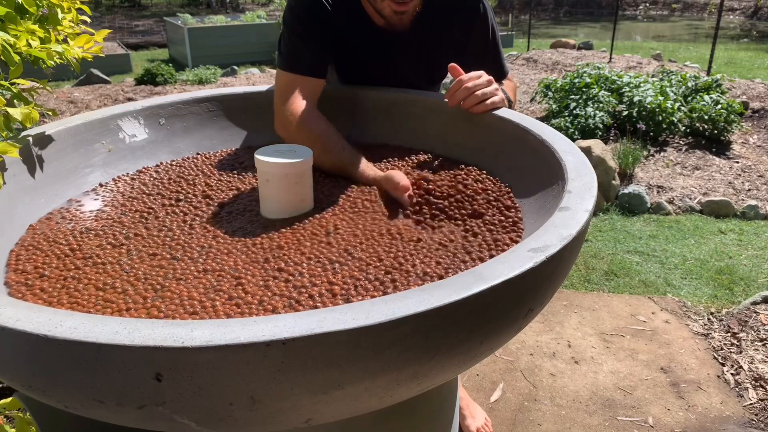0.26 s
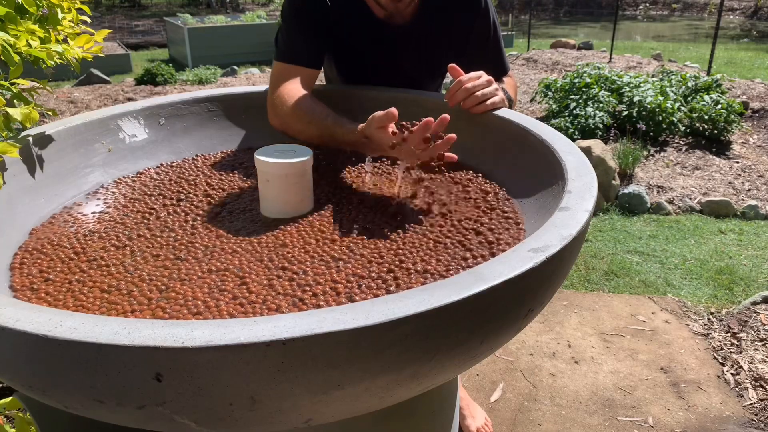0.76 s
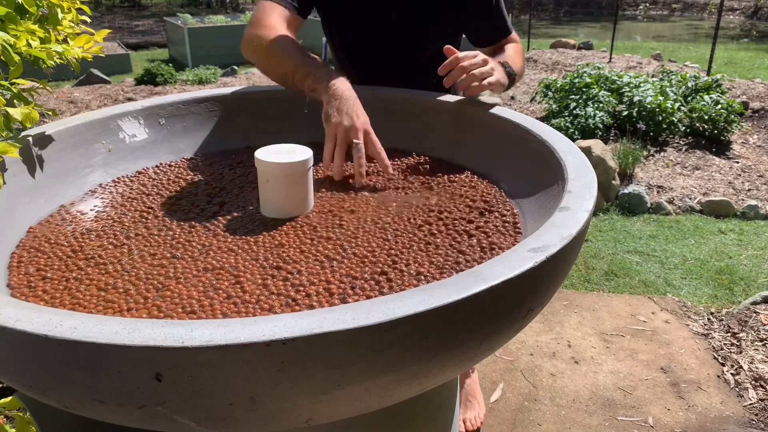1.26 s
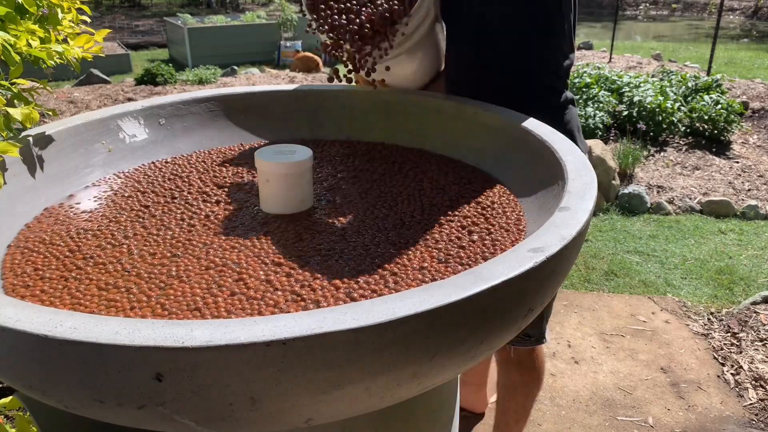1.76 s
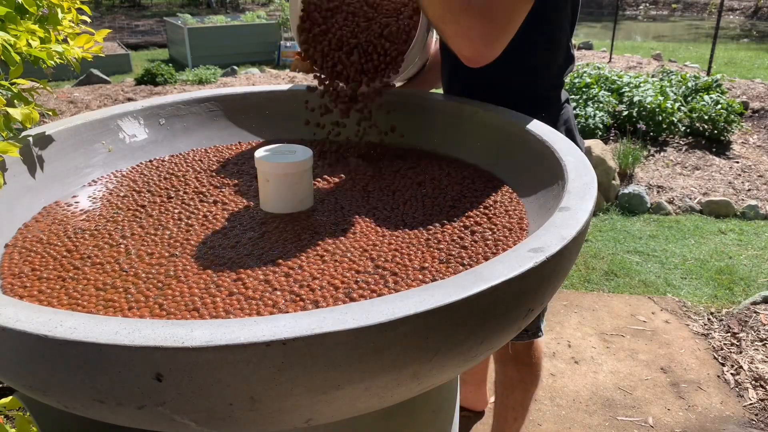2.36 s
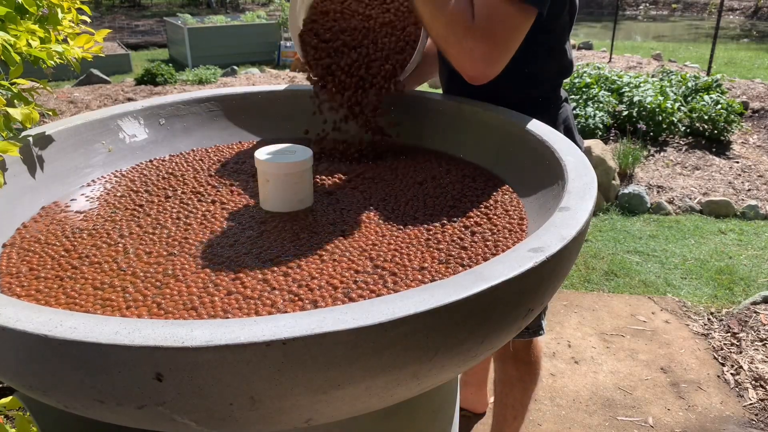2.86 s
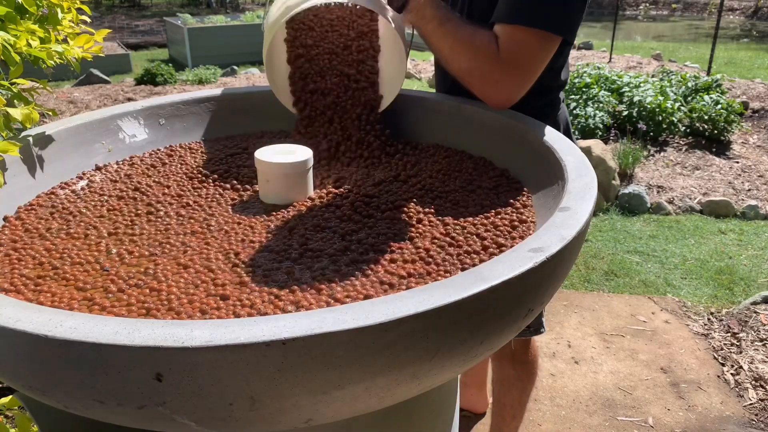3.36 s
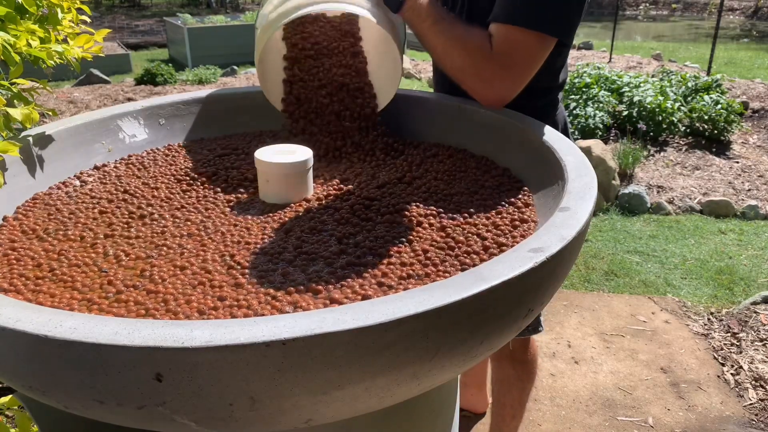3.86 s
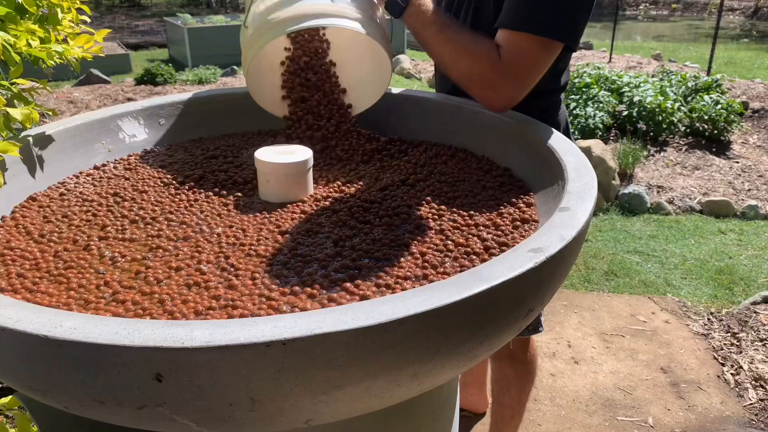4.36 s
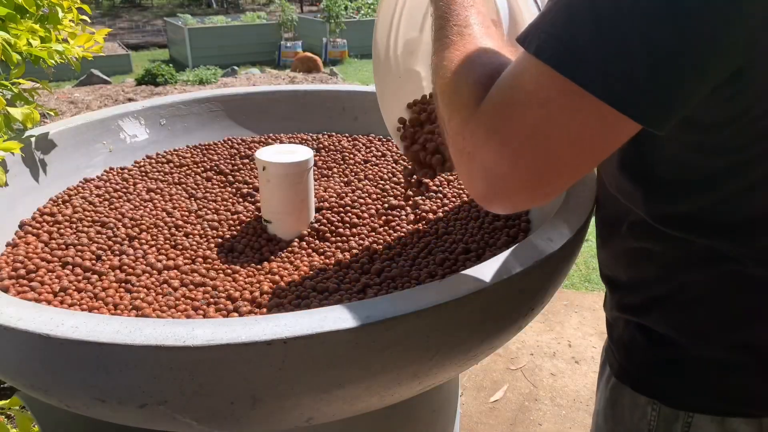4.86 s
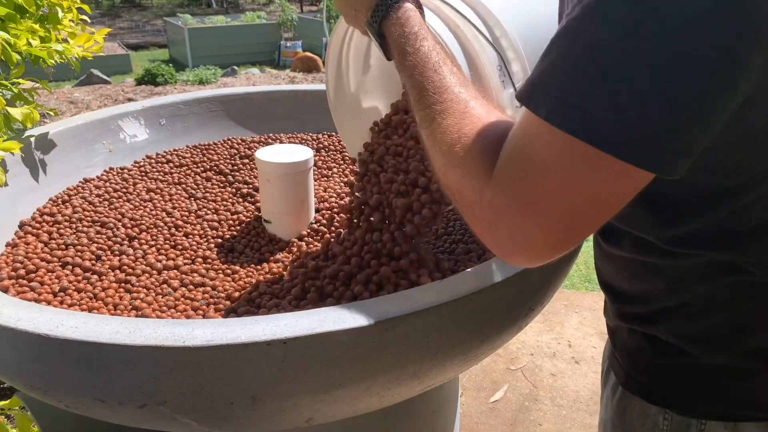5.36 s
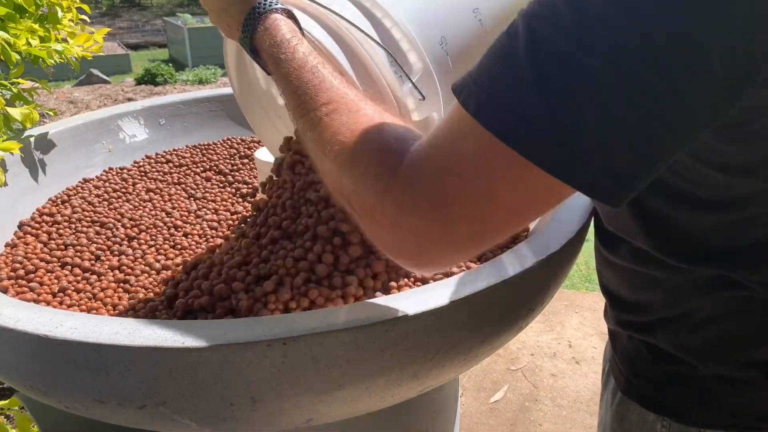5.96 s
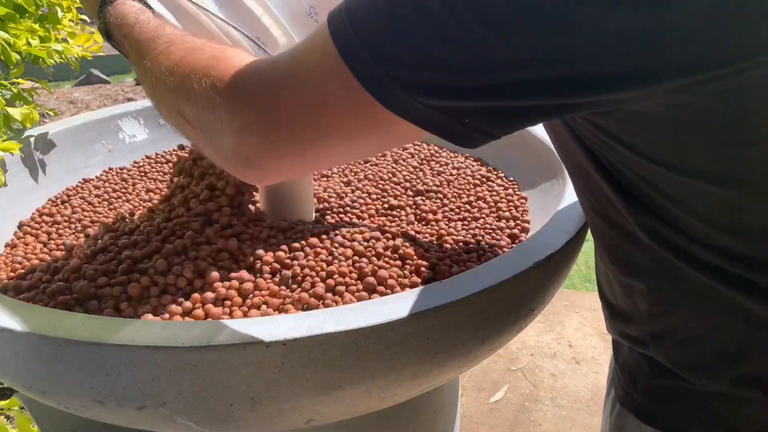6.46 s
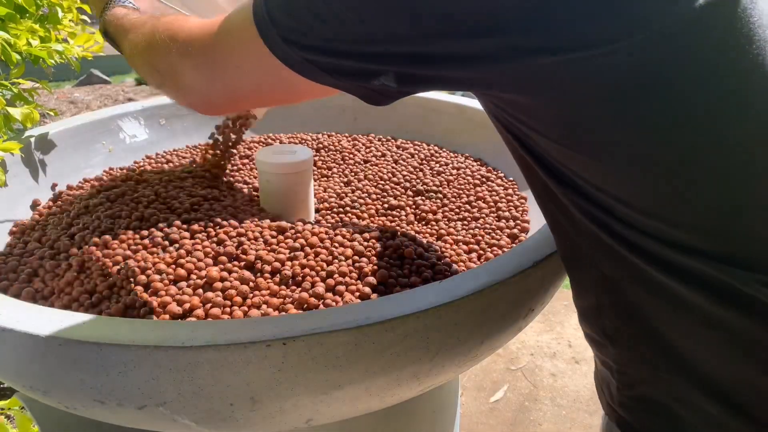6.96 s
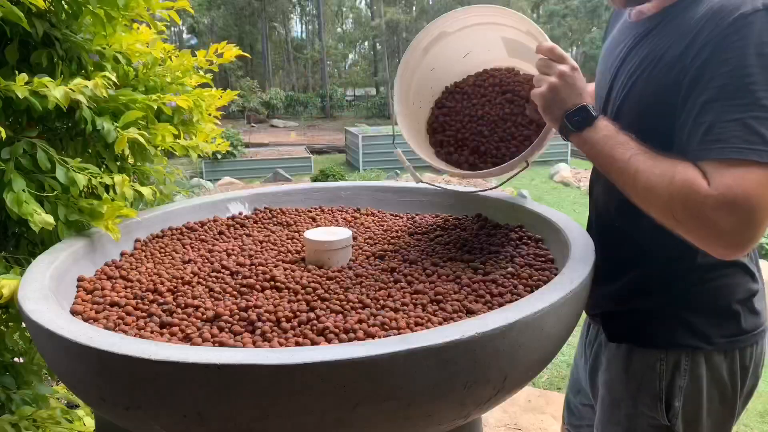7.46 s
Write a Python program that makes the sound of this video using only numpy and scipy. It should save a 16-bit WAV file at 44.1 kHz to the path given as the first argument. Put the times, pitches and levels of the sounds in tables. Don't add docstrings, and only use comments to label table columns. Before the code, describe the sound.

Close, dry outdoor camera sound with little treble above 7 kHz. Faint garden hush and tiny drips open; at about 0.3 s a hand stirs wet clay pebbles, with two hard snaps near 0.45 s. From 0.7 to 1.3 s light clinks, fine ticks and rising bubble plops trickle down, fading to silence at 1.5 s. At 1.6 s a pour bursts in with clacks and splashy rattle, dull blows near 1.9 s and a bright one at 2.5 s, dipping at 3.0 s. A thinner, bass-less stream of clumpy knocks over faint water swells around 3.5 and 4.0 s. After a cut at 4.35 s comes the loudest dense clatter, tumbling until 5 s, with a rap at 5.15 s; its lows thin after 5.2 s. Hollow plastic resonance joins from 6.2 s, then a rap near 7 s and dwindling stragglers. A new pour with hard raps starts at 7.35 s and runs to the end.

```python
import sys
import numpy as np
from scipy import signal
from scipy.fft import rfft, irfft, next_fast_len
from scipy.io import wavfile
from scipy.ndimage import uniform_filter1d, map_coordinates

SR = 44100
rng = np.random.default_rng(int(sys.argv[2]) if len(sys.argv) > 2 else 0)


def linear_from_db(decibels):
    return 10 ** (np.asarray(decibels, float) / 20)


def materialize(psi):
    bounded = np.clip(np.atleast_2d(psi).T, -1, 1)
    quanta = np.round(bounded * 32767).astype(np.int16)
    wavfile.write(sys.argv[1], SR, quanta)


N = 340452
NOW_S = np.arange(N) / SR


def unit(x):
    return x / np.sqrt(np.mean(x ** 2) + 1e-20)


def along(points, hz):
    f, v = np.transpose(points)
    return np.interp(np.log(hz + 1), np.log(f + 1), v)


def filtered(x, response):
    m = next_fast_len(len(x) + 8192)
    return irfft(rfft(x, m) * response(np.fft.rfftfreq(m, 1 / SR)), m)[:len(x)]


def above(hz, edge_hz, order):
    return 1 / np.sqrt(1 + (edge_hz / (hz + 1)) ** (2 * order))


def wobble(n, rate):
    return map_coordinates(rng.standard_normal(n // 100 + 4), [np.arange(n) * min(rate, 400) / SR])


def luck_within_two(shape):
    return np.clip(rng.standard_normal(shape), -2, 2)


def placed(waves, start_s, n):
    at = np.round(start_s * SR).astype(int) + np.arange(waves.shape[1])
    return np.bincount(at.ravel(), waves.ravel(), n + SR)[:n]


def rings(n, start, size, hz, t60, rise=0, length=384, soft=0.25):
    t = np.arange(length) / SR
    turns = hz[:, None] * t
    life = t / t60[:, None]
    wave = size[:, None] * linear_from_db(-60 * life) * np.sin(2 * np.pi * turns * (1 + rise * life))
    wave = wave * (1 - np.exp(-(turns / soft) ** 2))
    return placed(wave, start[:, None], n)


# pitch_hz, level_db
GARDEN = [(88, -54), (150, -19.5), (767, -13), (1270, -9), (1820, -14), (4050, -4.5), (6390, -8),
          (7400, -12.5), (9620, -57), (16300, -120)]
# start_s, level_db
AIR = [
    (0, -72),
    (.03, -61.5),
    (1.25, -54.5),
    (1.4, -66),
    (1.48, -100),
    (1.49, -130),
]


def garden():
    level_db = np.interp(NOW_S, *np.transpose(AIR))
    return linear_from_db(level_db) * unit(filtered(rng.standard_normal(N), lambda f: linear_from_db(along(GARDEN, f))))


# start_s, level_db
MURMUR = [
    (3.02, -97),
    (3.1, -63.5),
    (3.4, -60),
    (3.9, -67),
    (4.25, -66),
    (4.34, -101),
]


def murmur():
    level_db = np.interp(NOW_S, *np.transpose(MURMUR), left=-140, right=-140)
    band = lambda f: above(f, 540, order=8) * above(760, f, order=8)
    return linear_from_db(level_db) * unit(filtered(rng.standard_normal(N), band))


# start_s, peak_db, pitch_hz, t60_s
BUBBLES = [
    (0.034, -35, 2300, 0.018),
    (0.06, -25, 3240, 0.037),
    (0.216, -44, 630, 0.053),
    (1.243, -41, 1960, 0.086),
    (1.264, -48, 2370, 0.034),
           (0.344, -16, 765, 0.011), (0.784, -31, 930, 0.016), (0.918, -46, 1430, .04),
         (0.937, -41.5, 1200, 0.068), (.963, -41, 990, .03), (1.007, -27, 780, 0.044),
         (1.027, -31, 1510, 0.046), (1.083, -43, 1500, 0.043), (1.108, -42, 1960, .04),
         (1.173, -33.5, 770, 0.064), (1.175, -45, 1280, .06), (1.192, -42, 865, 0.076),
         (1.209, -46, 1270, 0.07), (1.246, -43, 1200, 0.07), (1.262, -38, 1410, 0.034)]


def bubbles():
    s, db, hz, t60 = np.transpose(BUBBLES)
    return rings(N, s, linear_from_db(db), hz, t60, rise=0.096, length=4096, soft=1.4)


def knocks(table, swell_s, gain_db, side_db, top_hz, top_db, crack_db):
    s, db, hz = np.transpose(table)[:, :, None]
    luck = rng.random((len(table), 18))
    t = np.arange(768) / SR
    swell = swell_s * (.75 + .5 * luck[:, [0]])
    body = t / swell * np.exp(1 - t / swell)

    def tone(f, k):
        return np.sin(2 * np.pi * (f * t + luck[:, [k]]))

    def cluster(f, first):
        return sum(tone(f * 2 ** (.8 * luck[:, [k]] - .4), k + 1) for k in range(first, first + 8, 2)) / 2

    wave = body * (tone(hz, 1) + linear_from_db(side_db) * cluster(hz, 2) + linear_from_db(top_db) * cluster(top_hz, 10))
    grit = rng.standard_normal((len(table), len(t) + 5))
    wave += linear_from_db(crack_db) * body ** 2 * (grit[:, 5:] - grit[:, :-5])
    wave *= linear_from_db(db + gain_db + 3) / np.abs(wave).max(axis=1, keepdims=True)
    return placed(wave, s - swell, N)


# peak_s, peak_db, pitch_hz
CLINKS = [(0.7474, -39, 2330), (0.7631, -38, 2590), (0.7719, -39, 2650), (0.7809, -41, 2880),
          (0.8086, -29, 3260), (0.8219, -28, 3080), (0.8298, -26, 2980), (0.8392, -26, 3030),
          (0.8451, -27, 3040), (0.8496, -34, 2700), (0.856, -26, 3170), (0.8614, -30, 3200),
          (0.886, -28, 2800), (0.8944, -34, 2680), (0.9061, -32, 2670), (0.9171, -30, 2630),
          (0.9271, -33, 2870), (0.9337, -29, 2690), (0.9451, -27, 2920), (0.9512, -27, 2730),
          (0.9625, -24, 2640), (0.9698, -25.5, 2340), (0.9779, -30, 2910), (0.9885, -30, 2700),
          (0.9979, -25, 3490), (1.0082, -23, 2600), (1.0181, -21, 2550), (1.0222, -27, 2950),
          (1.0279, -17.5, 2910), (1.0334, -25, 2580), (1.0399, -28, 3170), (1.0535, -27.5, 2430),
          (1.0849, -28, 2400), (1.0998, -30, 2880), (1.1047, -26, 2900), (1.1101, -27, 2770),
          (1.1167, -24.5, 2960), (1.1239, -31, 3400), (1.1619, -28, 2840), (1.1679, -29, 3960),
          (1.1778, -23.5, 2640), (1.2717, -39.5, 2330)]
CLUMPS = [(3.367, -15.5, 1450), (3.3783, -12.5, 1460), (3.385, -19.0, 1420), (3.3956, -12.5, 1440),
          (3.4207, -19.0, 1420), (3.4667, -21.0, 1870), (3.4874, -12.0, 1490), (3.494, -19.5, 1520),
          (3.5007, -15.0, 1910), (3.5082, -18.5, 1730), (3.5262, -19.5, 1790), (3.5343, -19.0, 2150),
          (3.5437, -17.5, 1530), (3.55, -13.5, 1530), (3.5617, -14.5, 1550), (3.5964, -15.5, 1520),
          (3.6078, -17.5, 1570), (3.6299, -21.5, 1610), (3.6482, -20.0, 1780), (3.6556, -17.0, 1500),
          (3.6646, -19.0, 1550), (3.6728, -16.5, 1440), (3.679, -15.5, 1580), (3.84, -21.0, 1570),
          (3.8699, -13.5, 1800), (3.894, -12.0, 1600), (3.903, -8.0, 1540), (3.9126, -11.0, 1500),
          (3.9191, -10.0, 1700), (3.9309, -9.5, 1600), (3.9413, -7.5, 1410), (3.9542, -10.0, 1490),
          (3.9638, -10.5, 1460), (3.9731, -14.5, 1580), (3.9797, -12.0, 1840), (3.9865, -9.0, 1440),
          (3.9971, -7.5, 1520), (4.0063, -10.0, 1480), (4.0261, -13.0, 1540), (4.0377, -11.5, 1680),
          (4.046, -17.0, 1700), (4.0539, -12.0, 1920), (4.0837, -16.0, 1290), (4.0901, -12.0, 1440),
          (4.1027, -16.5, 1640), (4.1252, -18.5, 1610), (4.138, -18.0, 2010), (4.1525, -18.0, 2140),
          (4.1693, -14.5, 1600), (4.1755, -16.0, 1550), (4.1843, -12.0, 1490), (4.1906, -18.0, 1520),
          (4.1982, -17.0, 2210), (4.208, -15.0, 1820), (4.2204, -17.5, 1420), (4.2356, -21.0, 1920)]
SPRAYS = [(0.7452, -31, 6000), (0.81, -28.5, 6440), (0.815, -27, 6270), (0.8193, -30, 6200),
          (0.831, -30, 5750), (0.85, -22.5, 5450), (0.861, -28, 4840), (0.91, -21.5, 7120),
          (0.9166, -29, 5700), (0.9254, -26, 5400), (0.933, -23, 6400), (0.9497, -27, 5550),
          (0.962, -27.5, 6030), (0.9697, -28, 6300), (1.0056, -27, 6150), (1.02, -18.5, 5220),
          (1.028, -18.5, 5530), (1.0364, -25, 5850), (1.0442, -31, 6410), (1.113, -26, 6240),
          (1.118, -27, 6240), (1.1247, -26, 6500), (1.1357, -36, 6300), (1.161, -25, 5200),
          (1.168, -26, 4640), (1.181, -26, 4720), (1.264, -27, 5640)]
OPENING = [(1.6164, -12.5, 2000), (1.621, -17, 1930), (1.635, -16, 1860), (1.6357, -10, 1460),
           (1.651, -4.5, 1460), (1.657, -12, 1440), (1.666, -6, 1470), (1.675, -10, 1820),
           (1.687, -8.5, 3300), (1.691, -14, 1440), (1.7, -10.5, 2470), (1.707, -6.5, 2230),
           (1.7152, -8, 1420), (1.7283, -14, 2260), (1.7377, -10, 1310), (1.7461, -11, 1180)]
TUMBLE = [(4.5019, -5.0, 2080), (4.5171, -7.5, 2090), (4.5437, -4.5, 2060), (4.5834, -1.5, 970),
          (4.6071, -3.5, 1370), (4.6163, -6.0, 2680), (4.6314, -5.5, 2660), (4.6448, -6.0, 2250),
          (4.6721, -6.0, 1220), (4.6856, -5.5, 1300), (4.7136, -5.5, 2190), (4.7241, -6.0, 2150),
          (4.7407, -7.0, 1950), (4.7685, -1.5, 2450), (4.7938, -6.5, 1940), (4.8032, -8.5, 1570),
          (4.8145, -8.5, 1690), (4.8257, -7.5, 2400), (4.8408, -2.0, 2570), (4.8644, -3.0, 1350),
          (4.8715, -4.5, 2280), (4.8805, -4.5, 2310), (4.8997, -7.0, 2430), (4.9068, -4.5, 2810),
          (4.9207, -7.0, 2130), (4.9365, -3.5, 1860), (4.9456, -6.5, 2230), (4.9554, -6.5, 1720),
          (4.9657, -7.0, 2470), (4.9871, -4.0, 2530)]
STRAGGLERS = [(7.1065, -12.5, 2300), (7.1148, -12.0, 2280), (7.1263, -11.0, 2450), (7.1424, -9.0, 2820),
              (7.1541, -9.5, 2370), (7.1684, -10.0, 2300), (7.1798, -10.0, 2710), (7.1923, -11.5, 3220),
              (7.2058, -15.0, 2720), (7.2164, -18.5, 3110), (7.2241, -20.5, 2820), (7.2363, -21.5, 2970),
              (7.2435, -27.0, 3010), (7.254, -29.0, 2860), (7.2782, -33.0, 2800)]
RATTLES = [(2.4565, -9, 3200), (2.4868, -13.5, 3240), (2.5834, -14, 3420), (3.421, -19.5, 890),
           (3.545, -16, 850), (3.552, -16.5, 2590), (3.924, -12.5, 2840), (3.966, -13, 2350),
           (4.184, -18, 2690)]
# swell_s, gain_db, neighbour_db, upper_hz, upper_db, crack_db
KNOCK_KINDS = [
    (0.0012, 0.5, -3.5, 7900, -9.5, -23),
    (0.0022, -2.5, -5, 2600, -11, -24),
    (0.0019, -2.5, -2, 6600, -9, -19),
    (0.0014, -1, -10, 5200, -5, -14.5),
    (0.0012, -3.5, -2, 5400, -11.5, -10.5),
    (0.0014, 1, -1, 7100, -2.5, -6),
    (0.0025, -3, -6, 9100, -24.5, -23),
]


def single_knocks():
    tables = [CLINKS, CLUMPS, SPRAYS, OPENING, TUMBLE, STRAGGLERS, RATTLES]
    return sum(knocks(table, *kind) for table, kind in zip(tables, KNOCK_KINDS))


def clatter(table, t60, spread_s, gain_db, top_hz, top_db):
    upper = luck_within_two((len(table), 2)) * [.06, 2.5]
    s, db, hz, off, off_db = np.repeat(np.hstack([table, upper]), 4, axis=0).T
    luck = rng.random((len(s), 3))
    later = np.tile([0, 1, 2, 3], len(table))
    start = s + (later - 0.54 * luck[:, 0] * (later > 0)) * spread_s
    size = linear_from_db(db + gain_db - 1.2 * later * luck[:, 1])
    detune = (later > 0) * (luck[:, 2] - .5)
    low_hz = hz * (1 + 0.08 * detune)
    high_hz = top_hz * (1 + off + .3 * detune)
    low = rings(N, start, size, low_hz, np.full(len(s), t60), length=1024)
    high_size = size * linear_from_db(top_db + off_db)
    return low + rings(N, start, high_size, high_hz, np.full(len(s), .5 * t60), length=1024)


# start_s, peak_db, pitch_hz
SNAPS = [
    (0.326, -31, 3400),
    (0.385, -24, 2730),
    (0.405, -18, 2870),
    (0.45, 3, 2980),
    (0.483, 1, 3100),
    (0.5114, -14, 2480),
    (0.549, -22, 3080),
]
BLOWS = [
    (1.9165, -8.5, 1190),
    (1.939, -12.5, 1790),
    (2.4992, -7.5, 2630),
]
RAPS = [
    (5.152, -3, 1980),
    (6.971, -3, 1430),
    (7.437, -12, 1300),
    (7.497, -2, 1440),
    (7.652, -3, 2300),
]
# t60_s, contact_gap_s, gain_db, upper_hz, upper_db
KINDS = [
    (0.0065, 0.00097, -17.5, 3360, -7),
    (0.0067, 0.0014, -5.5, 17000, -9),
]
RAP_KIND = (.006, .0008, -1, 4600, -15)


def loud_strikes():
    return sum(clatter(table, *kind) for table, kind in zip([SNAPS, BLOWS, RAPS], [*KINDS, RAP_KIND]))


# low_hz, high_hz
BANDS_HZ = [
    (1250, 3850),
    (780, 1250),
    (4000, 7500),
    (150, 780),
]


def pour(span, flow, knock, colour, count, wash_db, scatter_db, cycles, spread, clump_db, thud_db):
    n = round((span[1] - span[0]) * SR)
    s, clack_db, clack_hz, crisp_db = np.transpose(flow)
    strongest_db = clack_db.max()
    knock_db = strongest_db + knock[0] + knock[1] * (clack_db - strongest_db)
    levels = [clack_db, knock_db, clack_db + crisp_db, knock_db + thud_db]
    now = span[0] + np.arange(n) / SR
    start = rng.random(int(count * n / SR)) * n / SR
    blow_db = scatter_db * luck_within_two(len(start))
    clumps = linear_from_db(clump_db * np.clip(wobble(n, 88.8), -2, 2))
    hollow_hz = np.interp(span[0] + start, s, clack_hz)
    out = np.zeros(n)
    for k, ((lo, hi), db) in enumerate(zip(BANDS_HZ, levels)):
        is_clack, is_tick = k == 0, k == 2
        pick = luck_within_two((len(start), 3))
        if is_clack:
            hz = hollow_hz * 2 ** (spread * pick[:, 2])
        else:
            hz = lo * (hi / lo) ** rng.random(len(start))
        size = linear_from_db(blow_db + 3 * pick[:, 0])
        near = rings(n, start, size, hz, 3 * cycles / hz * linear_from_db(3 * pick[:, 1]))
        far = linear_from_db(wash_db[is_tick]) * rng.standard_normal(n)
        sway_db = 0.67 * wobble(n, 45.21) + 0.47 * is_tick * wobble(n, 14.28)
        mix = clumps * linear_from_db(sway_db) * (unit(near) + far)
        shape = lambda f: linear_from_db(along(colour, f)) * above(f, lo, order=9) * above(hi, f, order=9)
        out += linear_from_db(np.interp(now, s, db)) * unit(filtered(mix, shape))
    return np.pad(out, (round(span[0] * SR), N))[:N]


def surges(tables):
    jam_db, jam_s, rush_db, rush_s = -6, .012, 1, .02
    strikes = np.sort(np.concatenate([np.transpose(t)[0] for t in tables] + [[-9, 99]]))
    after = np.searchsorted(strikes, NOW_S)
    jam = jam_db * np.exp((NOW_S - strikes[after]) / jam_s)
    rush = rush_db * np.exp((strikes[after - 1] - NOW_S) / rush_s)
    return linear_from_db(jam + rush)


# start_s, end_s
SPANS = [
    (0, .6),
    (.6, 1.49),
    (1.51, 3.006),
    (3.02, 4.342),
    (4.356, 6.36),
    (6.36, 7.317),
    (7.335, 7.72),
]
# start_s, level_db, hollow_pitch_hz, tick_over_flow_db
STIR = [(0, -56, 2760, -5), (.2, -61, 2550, -3), (.31, -42, 2500, -2), (.335, -39, 2800, 10.5),
        (.402, -22, 3000, -2), (.546, -27.5, 2860, -6), (.6, -37, 2800, -11)]
TRICKLE = [(.6, -36, 2400, -13), (.66, -33.5, 2220, -18), (.8, -44, 2920, -2), (.98, -44, 2430, 1.5),
           (1.02, -33, 2860, -4), (1.075, -42, 2400, -10.5), (1.186, -41.5, 2880, 3.5),
           (1.23, -61, 2290, 1), (1.49, -87, 3080, 4)]
SPLASH = [(1.51, -65, 1730, -40.5), (1.545, -45.5, 1890, -27), (1.564, -40, 1850, -12),
          (1.61, -27.5, 2080, -12), (1.645, -16, 1760, -7), (1.792, -19.5, 2120, -8.5),
          (1.961, -28, 2060, 5.5), (2.5, -20.5, 2070, -4.5), (2.873, -21.5, 2210, 0.5),
          (2.993, -32.5, 2070, -3), (3.006, -63, 1770, -7)]
SINK = [(3.02, -46, 1790, -6), (3.038, -49.5, 1780, -8), (3.152, -35, 1494, -8),
        (3.608, -24.5, 1620, -13.5), (3.792, -29.5, 1690, -10.5), (3.935, -19.5, 1620, -23),
        (4.15, -26.5, 1830, -11.5), (4.208, -22, 1600, -16), (4.342, -49.5, 1540, -12)]
HEAP = [(4.359, -57, 2090, -14), (4.401, -29.5, 1940, -8), (4.5, -11, 1930, -15), (4.819, -12.5, 1945, -14),
        (4.9, -10.5, 1930, -18), (5.14, -14, 2067, -7), (5.84, -12.5, 2047, -12), (6.2, -13, 1730, -8),
        (6.36, -13.5, 2090, -8.5)]
EMPTY = [(6.36, -12, 2020, -9.5), (6.86, -14, 2190, -7), (6.93, -17.5, 2440, -3), (6.974, -13, 2435, -5.5),
         (7.1, -19, 2130, -4), (7.2, -19.5, 2620, -5), (7.26, -41.5, 2610, -6), (7.317, -55, 2500, -6)]
TIP = [(7.335, -52, 1680, -7), (7.349, -51, 1590, -13), (7.353, -34, 1630, -15), (7.371, -32, 1590, -16),
       (7.415, -17.5, 1620, -13.5), (7.432, -19, 1680, -12.5), (7.483, -12.5, 1890, -11),
       (7.681, -13, 2177, -13), (7.72, -19, 1860, -14.5)]
# pitch_hz, level_db
STIRRED = [(88, -71), (150, -68.5), (412, -35), (684, -20), (1550, -13.5), (2040, -11.5), (2920, -10),
           (4180, -5.5), (6390, 2), (7400, -9.5), (9620, -74), (16300, -120)]
TRICKLING = [(180, -86), (300, -45), (777, -10), (964, -6), (1520, -20.5), (1860, -27), (2530, -14.5),
             (3780, -12), (6220, 2), (7400, -7), (9620, -59), (16300, -120)]
SPLASHING = [(88, -66.5), (150, -24.5), (328, -12.5), (440, -7.5), (641, 5), (845, -20.5), (1130, -11.5),
             (1420, -15.5), (2480, -14.5), (4690, -8), (6080, -0.5), (7050, -4), (7400, -6.5),
             (9620, -45.5), (16300, -120)]
SINKING = [(290, -85), (500, -55), (750, -29), (794, -4), (859, -13), (1130, -16.5), (1510, -14),
           (2940, -13.5), (3640, -20), (6180, -16), (7400, -26), (9620, -75), (16300, -120)]
HEAPING = [(88, -50), (150, -45), (201, -28), (380, -21), (527, -12), (662, -10.5), (905, -3), (979, 2),
           (1680, -11.5), (2290, -6), (4250, -4), (5990, 2.5), (6930, -1), (7400, -14), (9620, -61),
           (16300, -120)]
EMPTYING = [(410, -63), (700, -21), (750, -22), (796, -24.5), (905, -32.5), (969, -25.5), (1200, -23.5),
            (2030, -19), (4840, -11), (6070, -6.5), (6910, -8), (7400, -16.5), (9620, -48), (16300, -120)]
TIPPING = [(88, -61), (150, -42), (201, -49.5), (535, -33.5), (859, -25.5), (1360, -14.5), (2320, -15.5),
           (4760, -10.5), (5790, -5), (6820, -9), (7400, -16), (9620, -54), (16300, -120)]
# under_strongest_flow_db, swing_ratio (how much wider the knock swings)
KNOCK = [(-23, 0.63), (-20, 1.54), (-10, 0.91), (-8.5, 0.93), (-10.5, 1), (-13.5, 1.5), (-12, 1.03)]
CONTACTS = [2500, 1000, 3500, 1500, 3000, 3000, 3000]
# below_ticks_db, among_ticks_db
WASH_DB = [(-2, 0), (-6, -1), (-2, 2), (5, 12), (.5, 2), (1.5, 3), (-1, 1)]
# size_scatter_db, ring_cycles, pitch_spread_octaves, clumping_db, thud_over_knock_db
GRAIN = [(-3, 8.7, 0.27, 0.5, 1), (0, 14, 0.12, 0.5, -1), (0.5, 3.9, 0.547, 0.2, -6),
         (0, 8.3, 0.35, 0.5, -13), (-1.5, 4.7, 0.31, -0.18, -4), (0, 13.5, 0.36, -0.47, -16),
         (-0.5, 8.3, 0.64, -1, -3)]


def stream():
    flows = [STIR, TRICKLE, SPLASH, SINK, HEAP, EMPTY, TIP]
    colours = [STIRRED, TRICKLING, SPLASHING, SINKING, HEAPING, EMPTYING, TIPPING]
    stages = zip(SPANS, flows, KNOCK, colours, CONTACTS, WASH_DB, GRAIN)
    bed = sum(pour(*settings, *grain) for *settings, grain in stages)
    loudest_tumble = sorted(TUMBLE, key=lambda row: -row[1])[:6]
    return bed * surges([SNAPS, BLOWS, RAPS, loudest_tumble])


# start_s, end_s, level_db
THIN = [
    (0.722, 1.3, 0),
    (1.61, 1.762, 0),
    (3.33, 4.26, -4),
    (4.495, 4.99, -4),
    (7.1, 7.26, -6),
]


def thinned(bed):
    level_db = sum(db * (NOW_S > a) * (NOW_S < b) for a, b, db in THIN)
    gain = linear_from_db(uniform_filter1d(level_db, size=900))
    return bed + (gain - 1) * filtered(bed, lambda f: above(f, 1000, order=4))


def bucket(bed):
    wall_hz, width_hz, wall_db = 977, 59, 6
    from_s, takes_s, end_s = 6.22, 0.081, 7.32
    bare = np.clip((NOW_S - from_s) / takes_s, 0, 1) * (NOW_S < end_s)
    wall = lambda f: 1j * f * width_hz / (wall_hz ** 2 - f * f + 1j * f * width_hz)
    return linear_from_db(wall_db) * filtered(bare * bed, wall)


def scene():
    bed = stream()
    pebbles = thinned(bed) + bucket(bed) + single_knocks() + loud_strikes()
    return (garden() + bubbles() + pebbles)[None]


# start_s, low_cut_hz
WIND_FILTER = [
    (0, 173),
    (3.01, 847),
    (4.355, 164),
    (5.22, 432),
    (5.573, 825),
    (7.33, 177),
]


def wind_filter(x):
    starts, edges_hz = np.transpose(WIND_FILTER)
    step = np.searchsorted(starts, NOW_S, "right") - 1
    out = np.zeros(N)
    for k, hz in enumerate(edges_hz):
        in_use = uniform_filter1d(1. * (step == k), size=800)
        out += in_use * filtered(x, lambda f: above(f, hz, order=24))
    return out


def limited(x):
    return x / (1 + np.abs(x / .82) ** 8) ** (1 / 8)


def bass_hiss(x):
    treble = filtered(x, lambda f: above(f, 2600, order=2))
    loudness = np.sqrt(np.abs(uniform_filter1d(treble ** 2, size=300)))
    hiss = unit(filtered(rng.standard_normal(N), lambda f: above(1100, f, order=4)))
    return linear_from_db(-31.5) * loudness ** 1.106 * linear_from_db(1.6 * wobble(N, 43)) * hiss


# middle_s, length_s
CUTS = [
    (1.492, 0.045),
    (3.007, 0.021),
    (4.351, 0.0037),
    (7.328, 0.01),
]


def fades():
    return np.prod([np.clip((np.abs(NOW_S - s) - .007) / length, 0, 1) for s, length in CUTS], axis=0)


# start_s, peak_db
SPARKS = [
    (1.6145, -62.5),
    (1.9164, -61.5),
    (2.994, -61.5),
    (4.3938, -56),
    (4.7668, -48),
    (5.1418, -48.5),
]


def sparks():
    s, db = np.transpose(SPARKS)[:, :, None]
    wave = linear_from_db(db + 0.5) * np.hanning(120) * rng.standard_normal((len(s), 120))
    return filtered(placed(wave, s, N), lambda f: above(f, 11500, order=12))


# pitch_hz, level_db
TOP = [(6900, 0), (7300, -11), (7700, -27), (8200, -80), (16000, -100)]


def band_limit(x):
    return filtered(x, lambda f: linear_from_db(along(TOP, f)))


def low_pass(x):
    return signal.sosfilt(signal.butter(12, 15830, fs=SR, output="sos"), x)


def record(dry):
    x = wind_filter(limited(dry[0]))
    x = x + bass_hiss(x) + murmur()
    x = band_limit(x * fades()) + sparks()
    return low_pass(x[None])


dry = scene()
out = record(dry)
materialize(out)
```